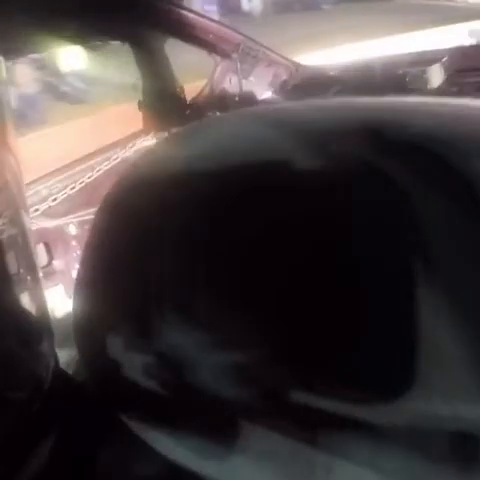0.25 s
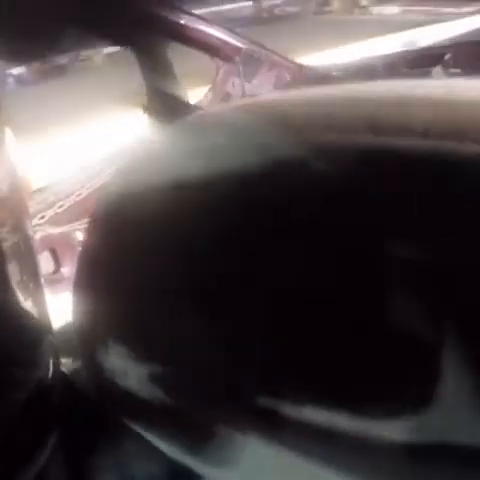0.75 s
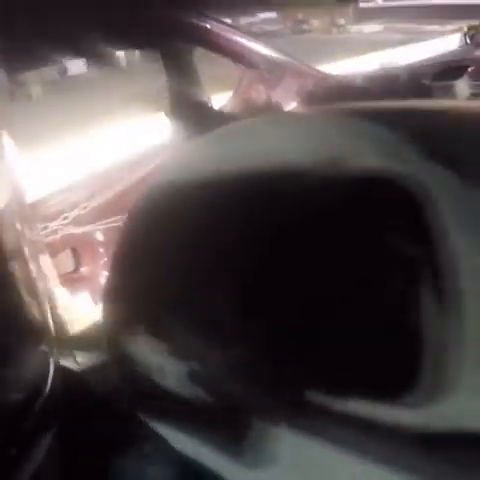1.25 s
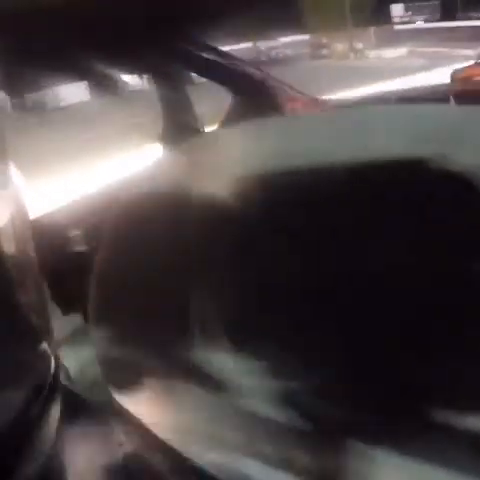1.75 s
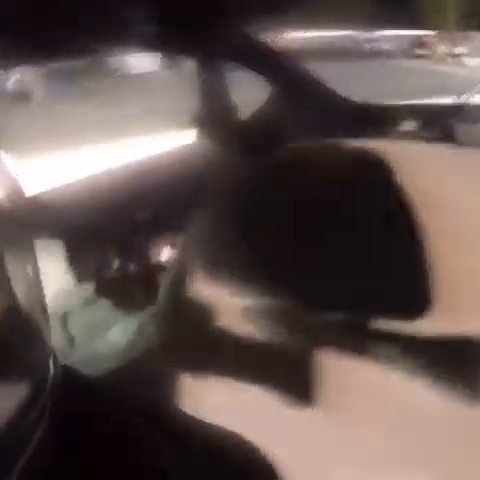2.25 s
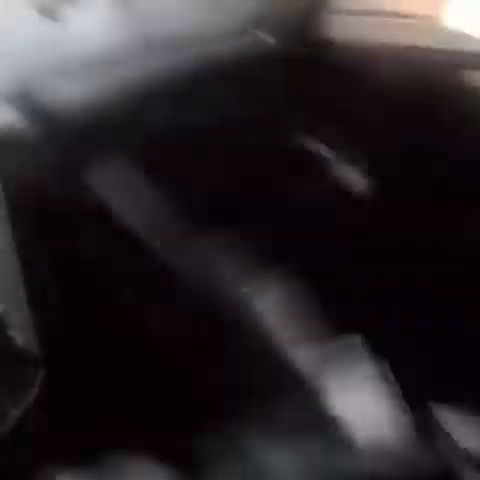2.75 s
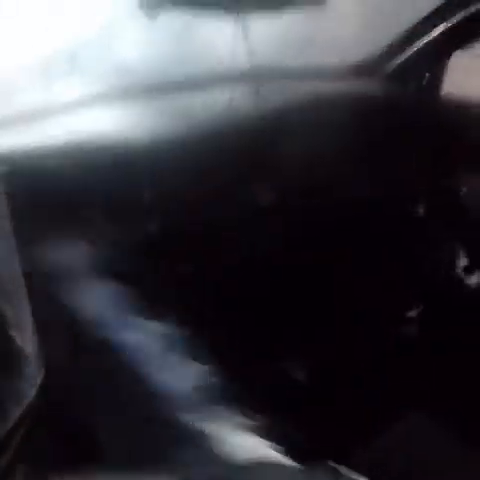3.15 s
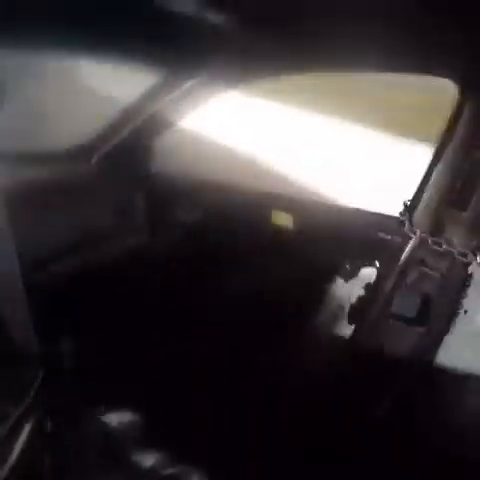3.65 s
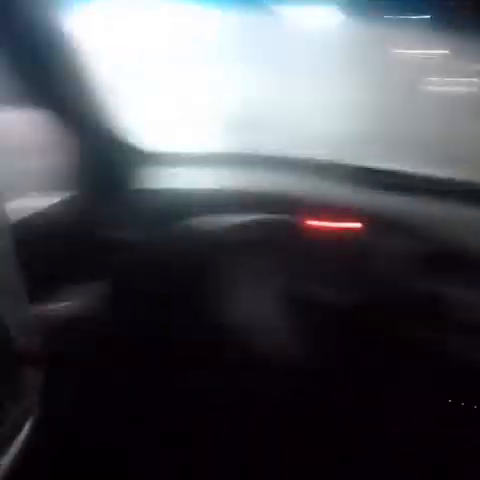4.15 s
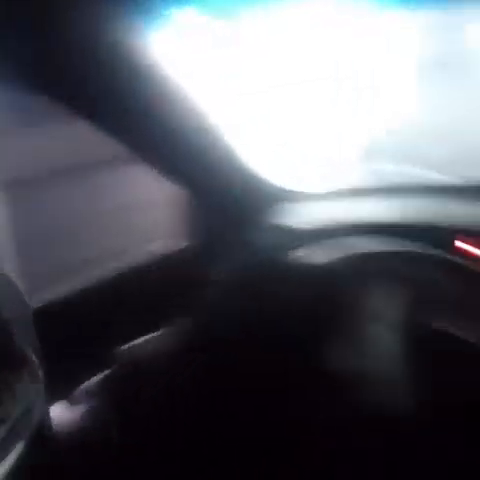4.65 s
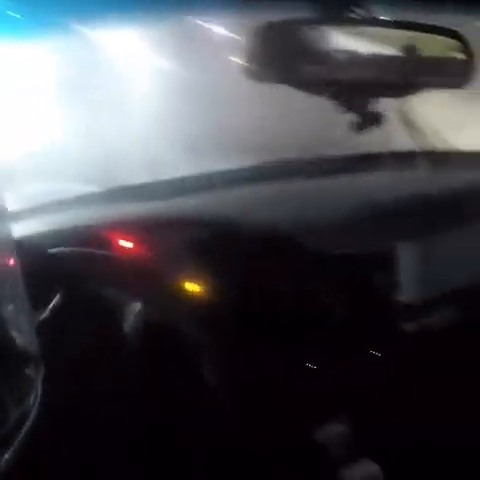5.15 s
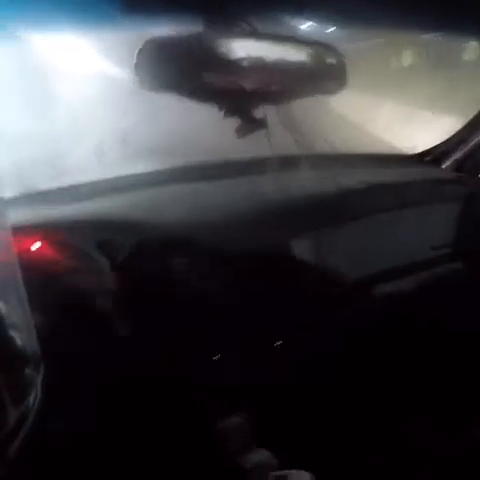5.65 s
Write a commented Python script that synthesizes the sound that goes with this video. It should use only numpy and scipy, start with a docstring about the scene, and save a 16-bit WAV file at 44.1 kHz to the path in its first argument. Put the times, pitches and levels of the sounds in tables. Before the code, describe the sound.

Inside a derby car, the engine booms and climbs while a rival revs raspily, a crunching crash stalls it, then it revs back up.

```python
"""A six-cylinder derby car from inside its cabin: the engine booms on its exhaust beat, stalls after a crash
and climbs back, built from harmonics of that beat plus weaker lines from uneven cylinders.
Alongside, a rival with open pipes revs hard and a further engine idles behind: jittered firing harmonics,
with hiss that puffs with the firings of the hard revs. Close around the microphone, decaying modes and noise
bursts make blows, rattle and chinks; drone and rumble lie behind. The small microphone squeezes the peaks."""
import sys
import numpy as np
from scipy import signal
from scipy.fft import rfft, irfft
from scipy.io import wavfile
from scipy.ndimage import uniform_filter1d

SR = 44100
rng = np.random.default_rng(int(sys.argv[2]) if len(sys.argv) > 2 else 0)


def materialize(psi):
    """Save the field psi as 16-bit PCM at rate SR to the path in sys.argv[1].

    A 1-D psi becomes a single channel; in a 2-D psi each row is a channel.
    """
    bounded = np.clip(np.atleast_2d(psi).T, -1, 1)
    quanta = np.round(bounded * 32767).astype(np.int16)
    wavfile.write(sys.argv[1], SR, quanta)


N = 259749  # samples

# Own engine, one list a pull: t/s, bank beat f/Hz, bank beat level/dB, firing boom level/dB, third boom level/dB
OWN_PULLS = [
    [(0, 54.4, -17, -13.5, -17), (.12, 57.34, -22, -14, -16.5), (.5, 59.14, -18.5, -14, -20.5),
     (1.0, 60.02, -18, -13.5, -22.5), (1.5, 62.36, -19.5, -13.5, -22.5), (1.85, 65.4, -18.5, -12, -23),
     (2.15, 69.68, -21, -10.5, -28), (2.38, 71.33, -22, -11.5, -25), (2.5, 70.4, -31, -18, -39)],
    [(2.6, 50.1, -23, -40, -37), (2.72, 61.24, -34, -17.5, -25), (2.82, 66.4, -26, -16.5, -34.5),
     (2.96, 67.03, -38, -18, -24), (3.25, 66.06, -35, -11, -20), (3.33, 65.2, -27, -11.5, -21),
     (3.4, 62.2, -20, -18, -13.5), (3.47, 49.6, -31, -38, -13.5), (3.54, 46.13, -34, -37, -32)],
    [(4.54, 21.62, -47, -21, -20), (4.61, 29.07, -42, -16, -22), (4.82, 49.98, -34, -15, -13),
     (4.9, 56.4, -24, -11.5, -18.5), (5.04, 76.06, -24, -10, -21), (5.11, 80.2, -17.5, -11, -16),
     (5.18, 71.6, -20, -11, -23.5), (5.25, 65.47, -25, -11, -17.5), (5.38, 62.93, -24, -12, -12.5),
     (5.55, 61.56, -21, -12.5, -13), (5.82, 61.3, -24, -12.5, -13.5), (5.89, 61.5, -23, -12, -13.5)],
]
# Lines at thirds of the bank beat, from uneven cylinders: f/Hz, level/dB over the uneven-lines level
UNEVEN_LINES = [(40, -24.5), (90, -11.5), (170, -13.5), (260, -31), (340, -38.5), (420, -33.5), (520, -57),
                (590, -23), (680, -33.5), (800, -61.5)]
# Own exhaust roughness: t/s, uneven-lines level/dB, extra bark above 250 Hz level/dB,
# fifth multiple of the bank beat over its neighbours level/dB
OWN_BARK = [(0, -10, -3.5, 16.5), (1.35, -17, 7, 11), (1.9, -10.5, 3.5, 11.5), (2.4, -10.5, 2, 10),
            (2.6, -25.5, -10, 14), (3.3, -12.5, -15.5, 15), (4.6, -21, -8, 11), (5.099, -8, -2.5, 10),
            (5.3, -14, -12, 26), (5.89, -12.5, -5, 18)]
BURST_LEAD = .46  # the upper uneven lines bunch into one burst a cycle, this share of a cycle early

# Other cars, one list a rev; the fourth is a further engine idling behind, the rest a rival alongside: t/s,
# firing f/Hz, level/dB before the cabin response
OTHER_REVS = [
    [(0, 78.1, -23), (.1, 81.34, -31), (.3, 87.9, -29.5), (.4, 89.25, -20), (.63, 88.3, -26)],
    [(.86, 60.5, -45), (.94, 64.6, -27.5), (1.1, 78.7, -23), (1.25, 86.5, -24), (1.4, 85.8, -21.5),
     (1.51, 83.24, -34)],
    [(1.6, 66.37, -43), (1.75, 72.84, -31), (1.9, 79, -26), (2.0, 86.6, -27), (2.1, 92.3, -27.5),
     (2.3, 93.7, -25)],
    [(3.55, 49.2, -40), (3.7, 49.45, -41.5), (3.9, 51.68, -36), (4.1, 53.98, -37.5), (4.3, 55.73, -32.5),
     (4.45, 57.9, -32.5), (4.55, 58.1, -47)],
    [(4.2, 41.2, -46), (4.28, 47.48, -30), (4.36, 58.16, -23), (4.44, 64.7, -28), (4.6, 74.35, -27.5),
     (4.7, 76.77, -27), (4.8, 81.27, -21.5), (4.88, 79.1, -22.5), (5.0, 78.6, -46)],
]
# Cabin response to the third harmonic and up of the other cars: f/Hz, level/dB
UPPER_CABIN_RESPONSE = [(140, 13), (230, -1.5), (275, -3.5), (345, -12), (430, -7.5), (520, -12.5), (600, -21.5),
                        (700, -15.5), (850, -42.5), (1200, -29), (1420, -37.5), (2000, -36)]
# Manner of each rev: odd over even harmonics level/dB, timing jitter/rad, fundamental level/dB,
# second harmonic level/dB, brightness/(dB per octave)
REV_MANNER = [(6.5, 0.027, -19.5, -27.5, -0.2), (2, 0.071, -30, -38, 2.5), (-4.5, 0.078, -34, -27, -3.5),
              (-9, 0.086, -35, -32, 0.5), (9.5, 0.054, -34, -18, 0.7)]
# Cabin response to the two lowest harmonics of the other cars: f/Hz, level/dB
CABIN_RESPONSE = [(45, 6), (80, -3.5), (100, -3.5), (128, 6.5), (150, -1), (190, 0)]

# Exhaust roar through the body: t/s, hiss level/dB, rasp level/dB
ROAR_LEVELS = [(0, -34.5, -30.5), (.4, -26.5, -32), (.59, -31, -30.5), (.64, -34.5, -37.5),
               (.8, -33, -39.5), (.89, -31, -38), (1.39, -31, -32), (1.52, -41.5, -38), (2.08, -35, -35.5),
               (2.51, -38, -36), (2.535, -52.5, -48), (2.62, -43.5, -40.5), (2.99, -45.5, -47.5),
               (3.31, -40.5, -42), (3.52, -49, -47.5), (3.62, -42.5, -36.5), (4.12, -44.5, -44.5),
               (4.31, -30, -35.5), (4.5, -22, -35.5), (4.7, -23.5, -30.5), (5.02, -31, -34.5),
               (5.2, -33.5, -37.5), (5.89, -36.5, -39)]
# Colours of hiss, rasp and top sizzle, each: f/Hz, level/(dB per Hz)
HISS_TONE = [(1350, -23), (2300, -11), (3210, -5.5), (3450, -3.5), (4010, -4.5), (4630, -4), (5050, -4.5),
             (5750, -3), (7230, -17.5), (8860, -22), (11000, -40), (14300, -72.5), (22000, -120)]
RASP_TONE = [(470, -46.5), (800, -5.5), (1190, -5), (1390, -4), (1520, 0), (2440, -9.5), (2800, -18.5),
             (3640, -32), (6160, -120)]
TOP_TONE = [(10300, -54), (11400, -16), (12100, -4.5), (13200, -5), (14300, -3), (15300, -15)]
# The sizzle follows the hiss: level/dB at a hiss of -30 dB, and dB gained per dB of hiss
SIZZLE_DB, SIZZLE_SLOPE = -55.5, 1.2
# Hiss resonances: start t/s, end t/s, level/dB over the plain hiss,
# then modes of f/Hz, least width/Hz (at least f/14 is used), level/dB
HISS_RINGING = [(0.055, 0.64, 1, [(1197, 32, 5.5), (1430, 87, 5), (2360, 86, -3), (3500, 110, -4),
                (4040, 1000, -3.5), (6500, 170, -10)]), (0.801, 1.469, -6, [(990, 200, 5), (1210, 90, 4),
                (1745, 120, 9), (5030, 700, -17), (8200, 2500, -9.5)]),
                (2.599, 3.504, -6.5, [(1575, 150, -15), (3230, 240, -5.5), (4990, 320, -7)]),
                (4.219, 5.048, -1.5, [(1910, 230, -0.5), (2626, 31, -17), (2970, 190, -20),
                (3490, 110, -15), (4700, 160, 2), (5460, 130, -2.5), (5700, 43, -4.5), (5936, 300, -1),
                (4328, 200, -8)]), (4.88, 5.004, -1, [(729, 200, 0), (940, 260, -5)])]

# Blows on the body shell: t/s, peak ring level/dB, brightness/(dB per octave)
SHELL_BLOWS = [(2.295, -7, 5), (2.307, -20, 0), (2.328, -17, -1), (2.465, -31, -1), (2.484, -20, 18),
               (2.495, -9.5, 18), (2.5041, -3, 11), (2.51, -0.5, -6.5), (2.876, -6.5, -25),
               (3.584, -12, -7), (3.601, -7, -2), (3.612, -6.5, -3), (3.622, -7, -3), (4.067, -10.5, -14),
               (4.208, -14, -13)]
# Shell modes: f/Hz, level/dB, t60/s
SHELL_MODES = [(62.97, -2, 0.14), (122, 12, 0.051), (234, 1, 0.06), (331, 0.5, 0.068), (419, 4.5, 0.046),
               (513.3, -4.5, 0.035), (717, -4, 0.04), (938, -21, 0.053), (1386, -23, 0.022)]
DENT_SPREAD = .07  # share of pitch: each blow finds the shell bent a little differently
# Sheet metal crumples under each blow: f/Hz, level/(dB per Hz)
CRUMPLE_TONE = [(100, -32), (250, 5.5), (550, -2.5), (800, -24.5), (1700, -22), (4000, -41), (20000, -90)]
CRUNCH_DB, CRUNCH_T60_S = -11.5, 0.071  # level against the ring; decay
# Metal grinds through the crash: levels at the start, before the firing puffs
GRIND_START_S, GRIND_END_S = 2.304, 2.512
GRIND_HISS_DB, GRIND_RASP_DB, GRIND_DRONE_DB, GRIND_SIZZLE_DB = -28.5, -25.5, -15, -46
# Swell or sag while it grinds, in the order hiss, rasp, drone, sizzle: drift/(dB per s)
GRIND_DRIFTS = [-3, -5, -45, 38]
TAIL_DB, TAIL_T60_S = -56.5, 1.1  # the sizzle dies away after the grind

# Loose panels clatter: t/s, nominal peak level/dB
PANEL_CLATTER = [(.2523, -14), (0.3433, -13.5), (0.8107, -23), (1.578, -27.5), (1.667, -30), (1.7722, -32),
                 (1.9194, -36), (2.3048, -23), (2.363, -16.5), (3.5838, -21), (3.6472, -23), (3.702, -36),
                 (3.7893, -25.5), (3.906, -24), (3.929, -24), (4.133, -29), (4.1924, -26), (4.2438, -19.5),
                 (4.2968, -19), (4.3435, -15.5), (4.5421, -19), (5.5415, -33)]
# Colour of the clatter: f/Hz, level/(dB per Hz)
PANEL_TONE = [(530, -27), (900, -36), (1700, -6), (2990, -3), (4010, -3), (4850, -5), (6740, -12.5),
              (9700, -25), (15000, -60)]
CLATTER_T60_S = 0.16
# Loose chain and bolts: response f/Hz, level/dB
METAL_TONE = [(1000, -5.5), (1400, -0.5), (2600, -10.5), (4200, -1), (6000, 3), (8000, -20)]
CHINKS_PER_S, CHINK_T60_S = 90, 0.1
CHINK_DB, CHINK_SPREAD_DB = -7, 3.0  # level over the hiss; dB per unit of natural log of the random size

# Road and body noise: t/s, drone level/dB, floor-pan rumble level/dB
ROAD_LEVELS = [(0, -24, -28), (.3, -24.5, -40), (.85, -26.5, -18), (1.05, -21.5, -22), (1.45, -28.5, -17),
               (1.9, -25, -27.5), (2.45, -23.5, -17), (2.54, -35.5, -30), (3.0, -42, -25),
               (3.5, -36, -22.5), (3.65, -29, -20.5), (4.1, -34, -21), (4.25, -33, -15),
               (4.5, -21.5, -19.5), (4.95, -22.5, -22), (5.2, -28.5, -21), (5.4, -25, -30),
               (5.89, -30, -23)]
# Colours of drone and rumble, each: f/Hz, level/(dB per Hz)
DRONE_TONE = [(120, -14.5), (200, 1), (359, -8), (500, -9.5), (557, -11), (851, -23), (1000, -35.5),
              (1300, -57), (2200, -120)]
RUMBLE_TONE = [(18, -26), (35, -6.5), (55, 13.5), (80, 6), (120, 4.5), (160, 6.5), (250, -31.5),
               (400, -60.5)]
EDGE_HZ = 15400  # upper edge of the microphone band


def own_engine(rows):
    """Three clean booms on multiples of the bank beat, and weaker lines from cylinders that differ."""
    hz, *booms_db = columns(rows)
    count, start_s = len(hz), rows[0][0]
    angle = 2 * np.pi * np.cumsum(hz) / SR
    out = np.zeros(count)
    for k, db in enumerate(booms_db, 1):
        out += np.sqrt(2) * gain_of(db) * np.cos(k * angle - .4 * k ** 2)

    s, *rough = np.transpose(OWN_BARK)
    t = start_s + np.arange(count) / SR
    uneven_db, bark_db, fifth_db = (np.interp(t, s, v) for v in rough)
    for third in range(2, 36):
        if third in (3, 6, 9):  # already sounded by the clean booms
            continue
        line_hz = hz * third / 3
        # narrower phase scatter bunches the upper lines into a burst
        phase = rng.uniform(0, 2 * np.pi if third < 18 else 3.2) + 2 * np.pi * third * BURST_LEAD
        phase = phase + .012 * third * wobble(count, per_s=12)
        line_db = uneven_db + read(UNEVEN_LINES, line_hz)
        line_db += bark_db * np.clip(line_hz / 250 - 1, 0, 1)
        # the fifth multiple of the bank beat stands out
        line_db += fifth_db * (third == 15) + 1.8 * wobble(count, per_s=12)
        out += gain_of(line_db) * np.cos(third * angle / 3 + phase)
    return start_s, out * signal.windows.tukey(count, 800 / count)


def other_engine(rows, odd_db, jitter, first_db, second_db, tilt_db):
    """Firing pulses from an exhaust, coloured by the cabin; higher harmonics smear as the timing jitters."""
    hz, level_db = columns(rows)
    count = len(hz)
    angle = 2 * np.pi * np.cumsum(hz) / SR + jitter * wobble(count, per_s=30)
    lines_db = [first_db + read(CABIN_RESPONSE, hz), second_db + read(CABIN_RESPONSE, 2 * hz)]
    # the third harmonic sets the level, the others lean odd or even
    for k in range(3, 26):
        lean_db = (k > 3) * odd_db * (k % 2 - .5) + tilt_db * np.log2(k / 3)
        lines_db.append(level_db + read(UPPER_CABIN_RESPONSE, k * hz) + lean_db)
    out = np.zeros(count)
    for k, db in enumerate(lines_db, 1):
        unsteady = gain_of(db + 2.8 * wobble(count, per_s=9))
        out += unsteady * np.cos(k * angle + rng.uniform(0, 1.5))
    return rows[0][0], np.sqrt(2) * out * signal.windows.tukey(count, 1600 / count)


def firing_puffs():
    """Hiss jumps at each firing of the hard rival revs, else once per own engine cycle; puffs differ in size."""
    hz = np.full(N, 21.)  # puff rate while no engine sets it
    steady = np.full(N, 2.2)  # constant flow against the puffs
    for rows in OWN_PULLS:
        cycle = columns(rows)[0] / 3
        hz[round(rows[0][0] * SR):][:len(cycle)] = cycle
    for rows in OTHER_REVS[:2] + OTHER_REVS[-1:]:
        firing, start = columns(rows)[0], round(rows[0][0] * SR)
        hz[start:][:len(firing)] = firing
        steady[start:][:len(firing)] = 1.1  # open pipes cut the hiss deeper
    turns = np.cumsum(hz) / SR
    sizes = gain_of(2.6 * rng.standard_normal(2000))[turns.astype(int)]
    puffs = (steady + sizes * np.exp(-(turns % 1) / .25)) / (steady + .25)
    return evened(uniform_filter1d(puffs, size=24))


def ringing():
    """Noise through narrow resonances: short fuzzy whistles that ride on the hiss."""
    out, hz = np.zeros(N), np.geomspace(300, 12000, 300)
    for start, end, db, modes in HISS_RINGING:
        power = np.zeros(len(hz))
        for f, width, m_db in modes:
            offset = 2 * (hz - f) / max(width, f / 14)
            power += gain_of(2 * m_db) / (1 + offset ** 2) ** 2
        count = round((end - start) * SR)
        tone = np.c_[hz, 10 * np.log10(power)]
        whistles = noise(tone, patchy_db=3.5, flicker_db=1.4, count=count)
        add(out, start, gain_of(db) * whistles * signal.windows.tukey(count, .25))
    return out


def grinding():
    """Gains that the grinding metal adds to hiss, rasp, drone and sizzle."""
    t = np.arange(N) / SR - GRIND_START_S
    after = t - (GRIND_END_S - GRIND_START_S)
    on = uniform_filter1d(1. * (t > 0) * (after < 0), size=200)
    starts_db = GRIND_HISS_DB, GRIND_RASP_DB, GRIND_DRONE_DB, GRIND_SIZZLE_DB
    hiss, rasp, drone, sizzle = (on * gain_of(db + drift * t) for db, drift in zip(starts_db, GRIND_DRIFTS))
    tail = (after > 0) * gain_of(TAIL_DB - 60 * abs(after) / TAIL_T60_S)
    return hiss, rasp, drone, sizzle + tail


def roar():
    """Exhaust hiss, rasp and sizzle pulse with the firings over steadier drone and rumble."""
    hiss, rasp = along(ROAR_LEVELS)
    drone, rumble = along(ROAD_LEVELS)
    puffs = firing_puffs()
    sizzle = gain_of(SIZZLE_DB) * (hiss / gain_of(-30)) ** SIZZLE_SLOPE
    # independent noises add by power
    hiss, rasp, drone, sizzle = np.hypot([hiss, rasp, drone, sizzle], grinding())
    upper = hiss * (noise(HISS_TONE, patchy_db=1.5, flicker_db=-0.16) + ringing())
    upper += rasp * noise(RASP_TONE, patchy_db=1.0, flicker_db=0.45)
    top = sizzle * noise(TOP_TONE, patchy_db=0.0, flicker_db=-4.0)
    lower = drone * bass_noise(DRONE_TONE) + rumble * bass_noise(RUMBLE_TONE)
    return upper * puffs + top * evened(puffs ** 2) + lower


def shell_blows():
    """Each blow rings the shell's modes and crumples sheet metal; a soft one leaves upper modes unexcited."""
    out, t = np.zeros(N), np.arange(9000) / SR
    crush = bass_noise(CRUMPLE_TONE)
    dents = 1 + DENT_SPREAD * rng.uniform(-0.94, 1, (len(SHELL_BLOWS), len(SHELL_MODES)))
    for (s, db, bright), bends in zip(SHELL_BLOWS, dents):
        ring = np.zeros(len(t))
        for (hz, m_db, t60), bend in zip(SHELL_MODES, bends):
            decay = gain_of(m_db - 60 * t / t60 + bright * np.log2(hz / 60))
            ring += decay * np.sin(2 * np.pi * hz * bend * t) * np.minimum(t / 0.0023, 1)
        crunch_gain = gain_of(CRUNCH_DB + min(bright, 0) - 60 * t / CRUNCH_T60_S)
        crunch = crush[round(s * SR):][:len(t)] * crunch_gain * np.minimum(t / 0.0021, 1)
        add(out, s, gain_of(db) * (ring / abs(ring).max() + crunch))
    return out


def panel_clatter():
    """Loose panels rattle: short bursts of coloured noise with a sharp attack."""
    out, t = np.zeros(N), np.arange(9000) / SR
    for s, db in PANEL_CLATTER:
        # noise peaks stand about 10 dB above its rms
        shape = np.minimum(t * 2000, 1) * gain_of(db - 10 - 60 * t / CLATTER_T60_S)
        add(out, s, shape * noise(PANEL_TONE, patchy_db=3, flicker_db=.8, count=len(t)))
    return out


def chinks():
    """Small metal parts each ring one short pitch, louder as the roar swells."""
    hiss, out, t = along(ROAR_LEVELS)[0], np.zeros(N), np.arange(2600) / SR
    for place, pitch, size in rng.random((round(CHINKS_PER_S * N / SR), 3)):
        hz = 1000 * 8 ** pitch
        db = CHINK_DB + read(METAL_TONE, hz) - CHINK_SPREAD_DB * np.log(size + 0.012)
        decay = gain_of(db - 60 * t / CHINK_T60_S)
        ring = decay * np.sin(2 * np.pi * hz * t) * np.minimum(t / .002, 1)
        add(out, place * N / SR, hiss[int(place * N)] * ring)
    return out


def noise(tone, patchy_db, flicker_db, count=N):
    """Coloured noise with drifting patches and a flicker shared by all bands."""
    frames, hz = count // 128 + 6, np.fft.rfftfreq(512, 1 / SR)
    a, b, patches = rng.standard_normal((frames, 257, 3)).T
    patches = uniform_filter1d(uniform_filter1d(patches, size=5, axis=0), size=12, axis=1)
    flicker = evened(uniform_filter1d(rng.standard_normal(frames), size=3))
    level_db = read(tone, hz)[:, None] + patchy_db * evened(patches) + flicker_db * flicker
    z = (a + 1j * b) * gain_of(level_db)
    return evened(signal.istft(z, nperseg=512, noverlap=384)[1][:count])


def bass_noise(tone):
    """Noise coloured finely enough for the bass."""
    z = rfft(rng.standard_normal(N)) * gain_of(read(tone, np.fft.rfftfreq(N, 1 / SR)))
    return evened(irfft(z, N))


def wobble(count, per_s):
    """Slow random wander of about rms 1."""
    steps = rng.standard_normal(int(count * 60 / SR) + 300)  # 60 steps a second
    slow = evened(signal.lfilter([1], [1, -np.exp(-per_s / 60)], steps))[200:]
    return np.interp(np.arange(count) * 60 / SR, np.arange(len(slow)), slow)


def gain_of(db):
    """Decibels to gain."""
    return 10 ** (np.asarray(db) / 20)


def evened(x):
    """Scales to rms 1."""
    return x / np.sqrt(np.mean(x ** 2) + 1e-20)


def read(points, hz):
    """Reads a spectrum table on a log-frequency axis."""
    f, value = np.transpose(points)
    return np.interp(np.log(hz + 1), np.log(f + 1), value)


def columns(rows):
    """Samples every column of a curve table between its first and last row."""
    s, *values = np.transpose(rows)
    t = np.arange(s[0], s[-1], 1 / SR)
    return [np.interp(t, s, v) for v in values]


def along(rows):
    """Gains of the dB columns of a table over the whole scene."""
    s, *levels_db = np.transpose(rows)
    return [gain_of(np.interp(np.arange(N) / SR, s, db)) for db in levels_db]


def add(mix, s, sound):
    """Mixes a sound in at time s, in seconds."""
    part = mix[round(s * SR):][:len(sound)]
    part += sound[:len(part)]


def scene():
    """The own engine, the other cars' revs, the roar, the blows and the loose metal."""
    mix = roar() + shell_blows() + panel_clatter() + chinks()
    for rows in OWN_PULLS:
        add(mix, *own_engine(rows))
    for rows, manner in zip(OTHER_REVS, REV_MANNER):
        add(mix, *other_engine(rows, *manner))
    return mix[None]


def record(dry):
    """Soft overload of the small microphone, then its band limit."""
    squeezed = 0.96 * np.tanh(dry / 0.98)
    low_pass = signal.firwin(1023, EDGE_HZ, window=("kaiser", 10), fs=SR)
    return signal.oaconvolve(squeezed, low_pass[None], "same")


dry = scene()
out = record(dry)
materialize(out)
```